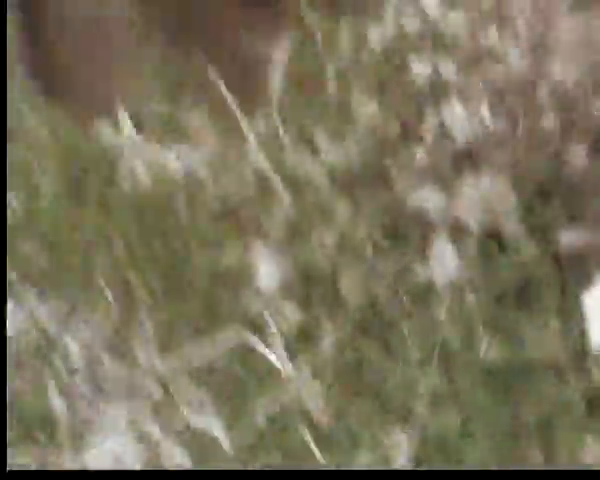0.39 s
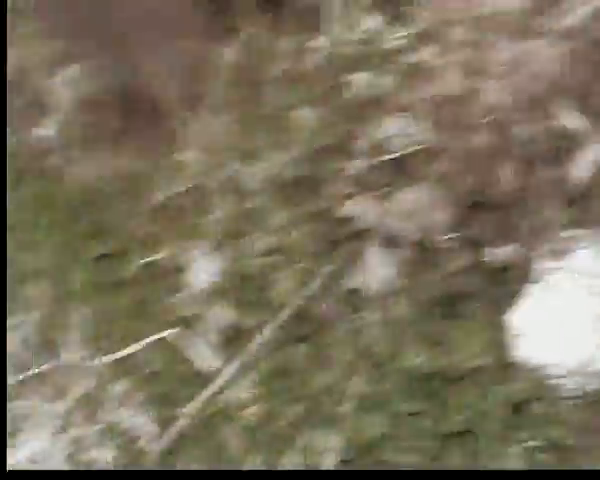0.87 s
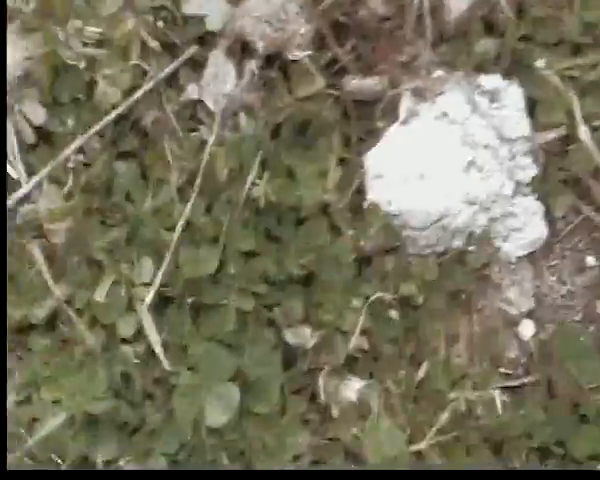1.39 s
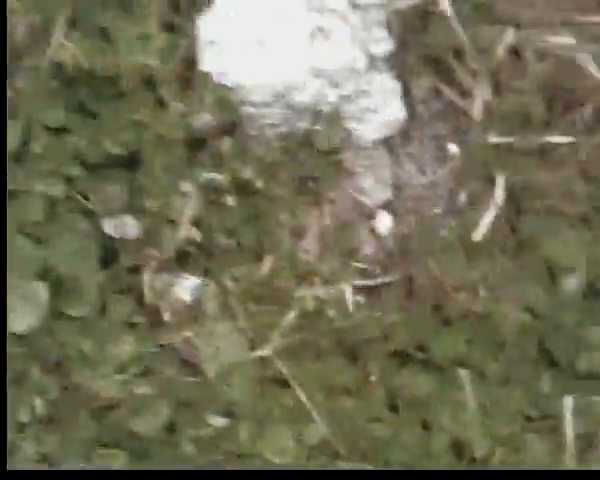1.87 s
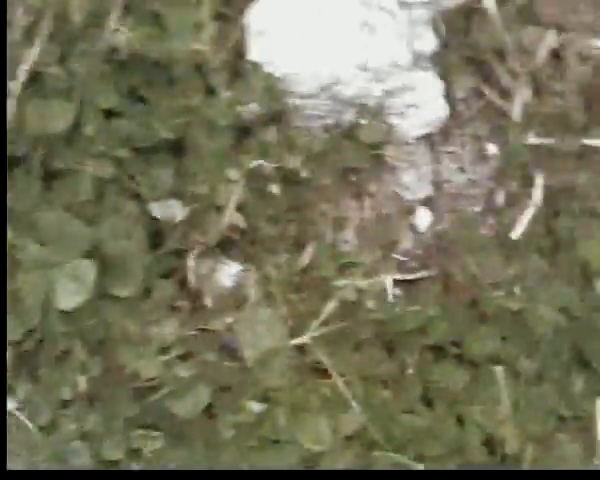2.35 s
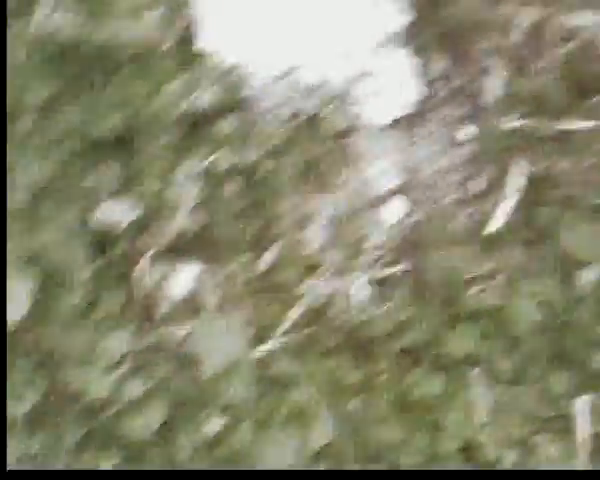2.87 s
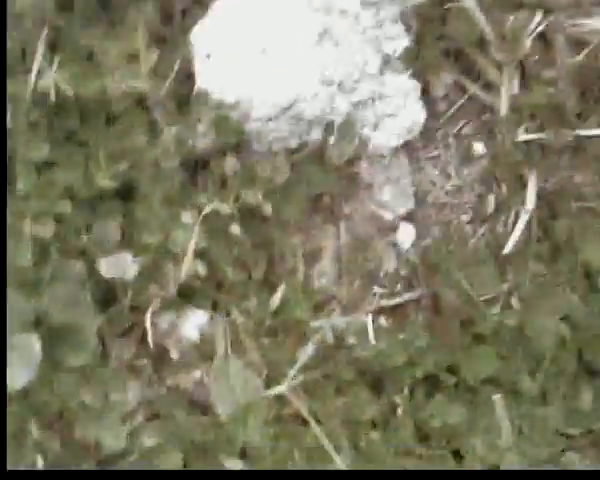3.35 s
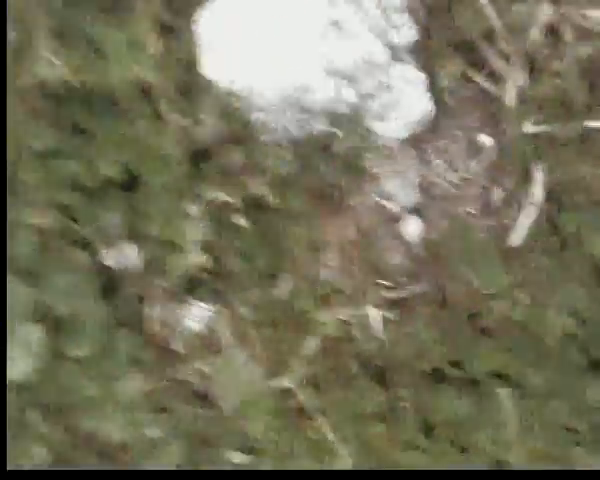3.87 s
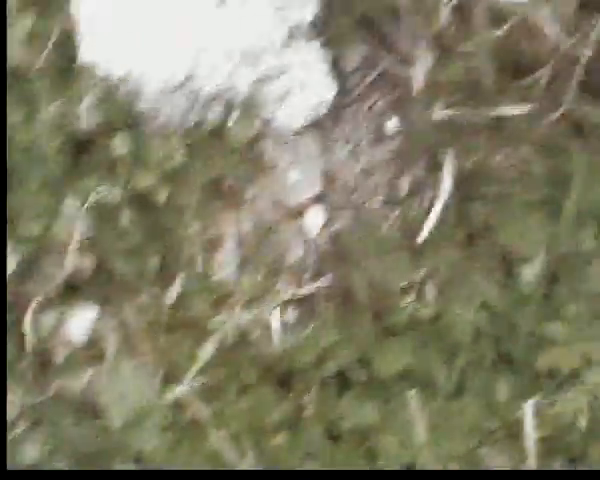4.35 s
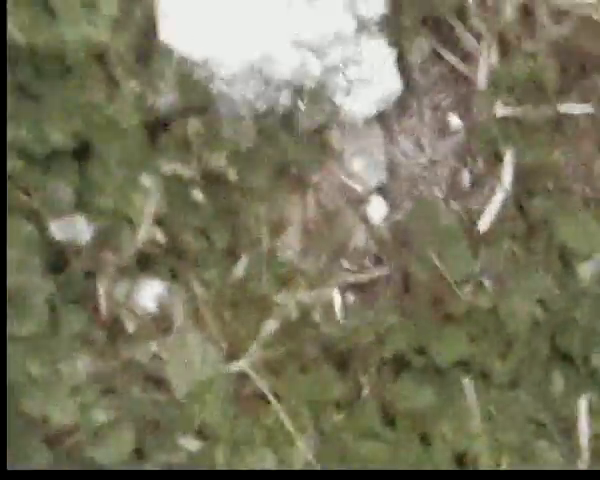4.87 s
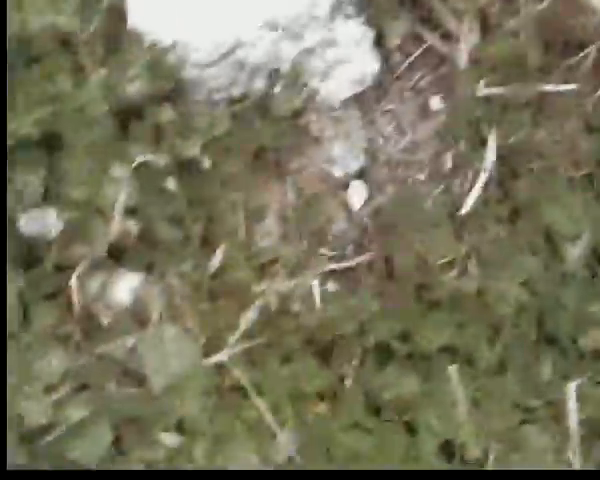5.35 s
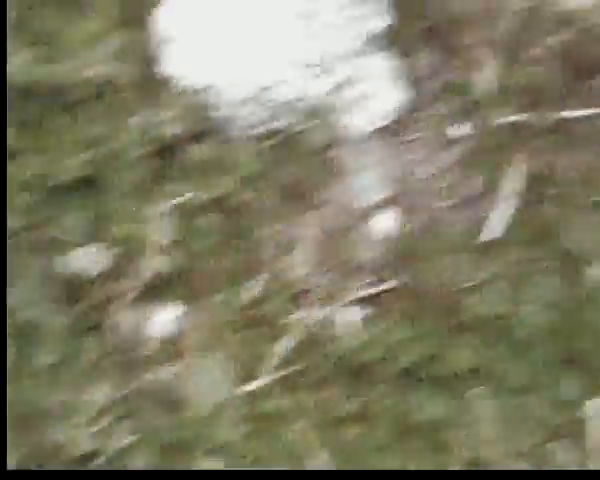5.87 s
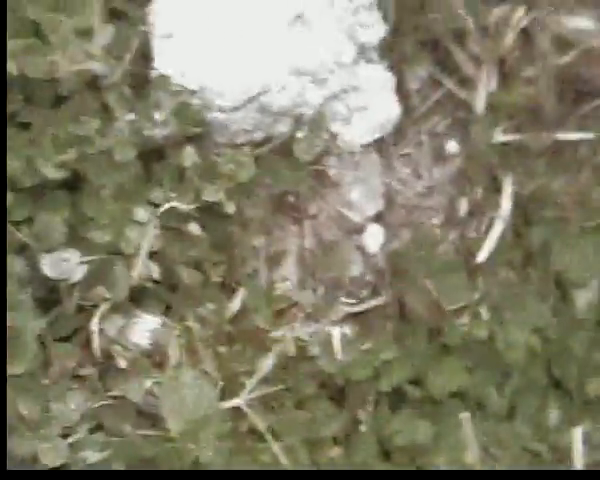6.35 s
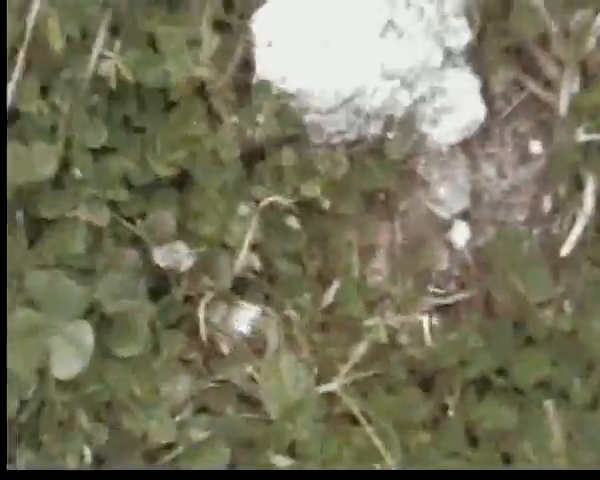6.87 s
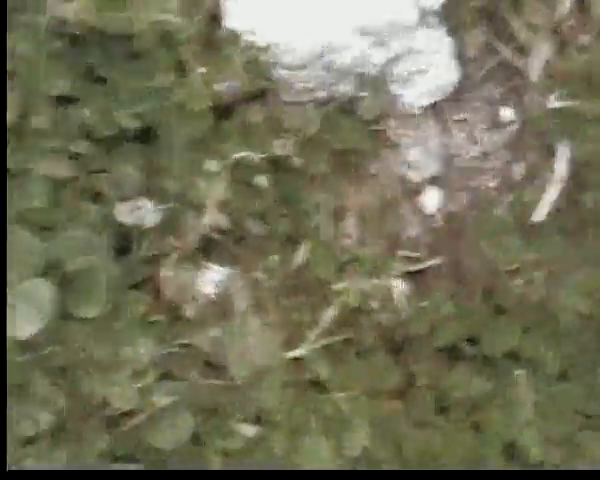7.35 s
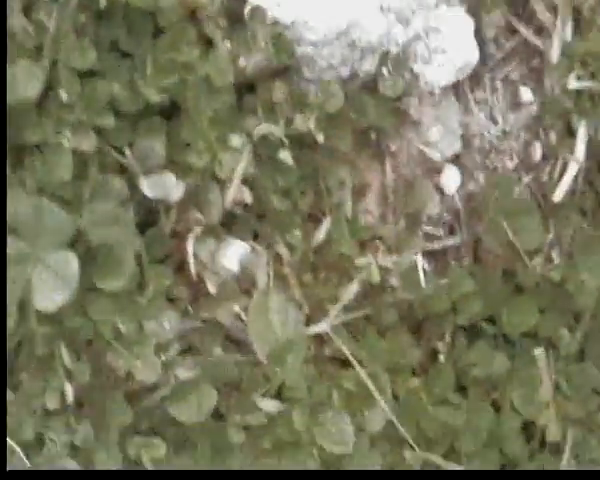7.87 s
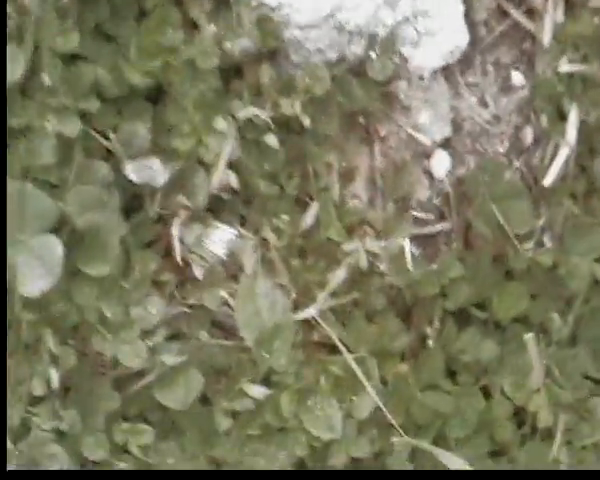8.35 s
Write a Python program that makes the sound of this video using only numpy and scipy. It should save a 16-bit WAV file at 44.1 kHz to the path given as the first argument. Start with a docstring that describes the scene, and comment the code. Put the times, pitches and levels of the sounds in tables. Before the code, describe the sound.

Close to a camera microphone outdoors, a small metal hand tool chops stony soil about three times a second. Each bite crunches, rings briefly and thuds, then the blade judders back over grit and loose crumbs patter. A small bird gives sharp upward chips now and then over a soft distant hush. Loud blows distort slightly, and a faint electronic whine persists.

```python
"""Stony, weedy soil at the edge of a far field hush, with one microphone on a camera.
In front, a small steel hand tool chops in a quick rhythm and is dragged back juddering over grit: bursts
of tiny impacts drive the blade's resonances. The ground thuds in low resonances, the handle knocks, and loose
crumbs patter down as clumped grains. A small bird chips nearby in upward flicks with leafy echoes, over
shaped noise. The camera whines faintly, clips the loud blows and ducks after them."""
import sys
import numpy as np
from scipy import signal
from scipy.fft import rfft, irfft, next_fast_len
from scipy.io import wavfile
from scipy.ndimage import uniform_filter1d, minimum_filter1d, map_coordinates

SR = 44100
rng = np.random.default_rng(int(sys.argv[2]) if len(sys.argv) > 2 else 0)


def wrap_up_sound(samples):
    """Save the sound to the file named by the first command line argument, as 16-bit audio."""
    columns = np.atleast_2d(samples).T
    # keep every value between -1 and 1, then stretch to whole-number steps
    tamed = np.clip(columns, -1, 1)
    steps = np.round(tamed * 32767).astype(np.int16)
    wavfile.write(sys.argv[1], SR, steps)


def volts_from_decibels(level):
    """Turn decibel levels (scalar or array-like) into linear amplitude factors."""
    exponent = np.asarray(level, float) / 20
    return 10 ** exponent


N = 385434
T = np.arange(N) / SR

# Levels in the tables are relative settings: sources add their own offsets, some a random spread.
# The blade chops in: (time [s], blade level [dB], soil over blade [dB], bright ring over blade [dB],
# length scale [ms], thud level [dB])
CHOP_BLOWS = [(0.4321, -18.5, 2, 3, 5.6, -15.5), (0.851, -1.5, -10.5, 1.5, 3.1, -15),
              (1.1979, -4, -13.5, 2.5, 3.4, -15), (1.5423, -15.5, -5.5, -2, 5.6, -18),
              (1.8788, -8.5, -15, -4.5, 5.4, -23), (2.2295, -14, -11, -1.5, 6.2, -27),
              (2.597, -0.5, -17.5, -4.5, 1.7, -20.5), (2.9405, -10, -3, 2.5, 4.1, -18.5),
              (3.295, -11, -5.5, 3, 4.2, -14), (3.6524, 1, -10.5, -5, 3.6, -20),
              (4.0305, -1, -7.5, -8.5, 4.05, -21), (4.385, -8.5, -2.5, -3.5, 4.2, -21.5),
              (4.7412, -14, 6, 0, 2.04, -10), (5.1181, -6.5, -3.5, -11.5, 3.7, -13),
              (5.4853, 0.5, -29, -4.5, 4.6, -21.5), (5.85, -5, -6, -10.5, 5.1, -18.5),
              (6.2309, -9.5, -2.5, -2.5, 4.3, -19), (6.6288, -6, -1.5, -5.5, 3.6, -28.5),
              (7.0448, -14, -1, -2.5, 5.9, -16.5), (7.594, -2.5, -10, -11.5, 2, -18),
              (8.1175, -7.5, -15.5, 4.5, 4, -24), (8.6192, -18, 0.5, 1, 4.1, -23)]
# The blade catches on stones and roots: (time [s], blade level [dB], soil over blade [dB],
# bright ring over blade [dB], length scale [ms])
STONE_CATCHES = [(0.0132, -11.5, 0.5, -10, 1.5), (0.0274, -7.5, -7.5, -10.5, 6.1),
                 (0.0434, -8, -10, -10, 3.9), (0.0566, -4, -12, -6.5, 4), (0.0692, -15.5, -2, 6, 1.7),
                 (0.107, -15.5, -1, -2.5, 4.5), (0.1276, -17.5, -13.5, -3.5, 1.7),
                 (0.2928, -24.5, -10, -24, 2.9), (0.3753, -42.5, 12.5, -17, 10.4),
                 (0.474, -1.5, -4, -11, 8.7), (0.5053, 1, -10, -10.5, 4.8), (0.5576, -8, -5.5, -1, 3.1),
                 (0.8888, -10, -0.5, -13, 2.4), (0.9082, -9.5, -10.5, -1.5, 3),
                 (0.956, -30.5, 1.5, 5.5, 2.2), (1.158, -41.5, 22.5, 19.5, 2.1),
                 (1.1922, -2, -15, -15, 1.7), (1.2369, -7, -6.5, -5.5, 3.7), (1.259, -4.5, -4.5, -4, 2.7),
                 (1.3145, -17.5, -29, -3.5, 4), (1.5784, -24, -7, -16, 4.4), (1.6177, -21.5, -13, -2.5, 12),
                 (1.6514, -21, -7, -0.5, 3.2), (1.8961, -4, -5, -2, 3.7), (1.96, -25.5, -9, 7.5, 2),
                 (1.9817, -20, -7, -2, 2), (2.0046, -6, -10.5, -6, 5.3), (2.2394, 5.5, -11.5, -13, 1.45),
                 (2.2996, -28, -21, 7, 9.7), (2.3315, -12.5, -9, 1, 2.1), (2.3457, -32, -1, -21, 3.5),
                 (2.357, -12.5, -5, -20, 1.33), (2.6457, -30, -23, -2, 5.8), (2.6653, -15, -11.5, -6, 9.9),
                 (2.7052, -4, -14, -4, 4.6), (2.9904, -18, -6, -4, 4.9), (3.003, -16, -16, -0.5, 9.7),
                 (3.042, -2.5, -25, -5, 2.7), (3.0488, -7.5, -13, -3.5, 6.1), (3.0716, -11.5, -44, -9.5, 4),
                 (3.3483, -8, -14, -12, 5.5), (3.3643, -12, -19, -3, 11), (3.4235, -9, -8, -10, 4),
                 (3.4523, -31, -22, -5, 3), (3.694, -2.5, -16, -27, 5.3), (3.7287, -4, -14.5, -3, 5.1),
                 (3.7627, -2.5, -16.5, -4.5, 5.7), (3.7883, -5, -25, -13, 4), (3.8021, -2, -20, -9.5, 3.7),
                 (3.82, -23, -16, 4, 3.3), (3.834, -34, -15, 2, 3.1), (4.0826, -12.5, -10.5, -7, 12),
                 (4.1078, -14.5, -10.5, 1.5, 3.7), (4.136, -4.5, -8.5, -4.5, 3.8),
                 (4.4371, -18, -9, -1, 4.8), (4.4571, -6, -4.5, -2.5, 8.1), (4.5334, -21, -22, 1.5, 2.8),
                 (4.5432, -24.5, -28, -2, 2.4), (4.7624, -3.5, -8, -3.5, 1.45),
                 (4.8067, -2, -12.5, -9, 5.8), (4.8167, -4, -14, -6, 12), (4.8756, -14.5, -8, 3.5, 3.6),
                 (4.929, -29, -7.5, -3, 3.2), (5.153, -21, -6, -12, 2.2), (5.1711, -16, -13, -6, 2.5),
                 (5.1781, -12, -7, -5, 12), (5.2015, -10, -18, -2.5, 2.5), (5.2223, -7.5, -2.5, -7, 2.7),
                 (5.2368, -15, -16, -20, 5.1), (5.2673, -23.5, -11, -28, 3.7), (5.3088, -29, -17, 1.5, 2.8),
                 (5.5041, -2.5, -6.5, -16, 1.6), (5.5614, -13, -4.5, -5.5, 7),
                 (5.5779, -8.5, -8, -2.5, 5.5), (5.6059, -2.5, -14.5, -12.5, 2.1),
                 (5.906, -19.5, -6, -14, 3), (5.9131, -10.5, -12.5, -10, 2.5), (5.9264, -8, -12, -5, 4.5),
                 (5.9417, -8, -17.5, -9, 3.3), (5.961, -9, -7, -5, 3.3), (6.004, -22, -17, -6.5, 2.4),
                 (6.2498, -13.5, -11.5, -10, 4.9), (6.297, -15, -13.5, -27, 2.9),
                 (6.3048, -9, -8, -25, 2.2), (6.31, -3, -26.5, -10, 4), (6.352, -5, -10, -10.5, 2.8),
                 (6.3766, -7, -9, -9, 1.9), (6.6422, -7, -9, -16, 1.6), (6.6917, -12, -6, -3, 3.8),
                 (6.6989, -6, -13, -10.5, 7.1), (6.7067, -10, -10, -12, 4), (6.7155, -11.5, -14, -14, 2.8),
                 (6.7277, -19, -29, 4.5, 1.8), (6.751, -6.5, -16.5, 2, 2.8), (6.8233, -29.5, -21, 2.5, 3.7),
                 (7.033, -23, 3, 5, 2.9), (7.1097, -13.5, -4.5, -4, 8.7), (7.1277, -7, -12.5, -10, 11.5),
                 (7.1606, -6.5, -16.5, -8, 7.2), (7.197, -15, -18.5, -9, 6.2),
                 (7.2522, -31, -27, 12.5, 2.6), (7.2773, -33.5, -9, 10.5, 5.5), (7.6104, -24, -3, 0.5, 4),
                 (7.691, -26, 0, -1, 4), (7.7122, -17, -6, -10, 5.4), (7.7313, -7, -15.5, -4.5, 1.7),
                 (7.758, -6, -20, -13, 3.6), (7.7684, -17, -14, -16, 2.8), (7.784, -6, -13.5, -4, 1.7),
                 (8.1311, -17, 4.5, -16, 12), (8.1876, -9.5, -11.5, -6.5, 3.7), (8.2033, -8, -18, -22, 4.8),
                 (8.2302, -14, -13, -7, 4.9), (8.2493, -18, -13, -5.5, 9.4), (8.2636, -13, -9, -12, 6.6),
                 (8.2796, -10, -19, -13, 4), (8.302, -31, -6, -13, 5.3), (8.3416, -32, -1, 4, 5.7),
                 (8.6324, -21.5, -2, -0.5, 8.1), (8.7042, -17.5, 3, -8, 4.6), (8.7251, -2.5, -8.5, -3, 4.1)]
# The blade is dragged back, then crumbs fall: (start [s], end [s], grind level [dB], crumb level [dB],
# patter length [s])
DRAG_STROKES = [(0.043, 0.11, -69, -51, 0.12), (0.467, 0.52, -45, -49, 0.13), (0.888, 0.96, -35, -41, 0.13),
                (1.245, 1.318, -63, -42, 0.062), (1.585, 1.658, -34, -47, 0.19),
                (1.94, 2.012, -33, -63, 0.057), (2.282, 2.367, -29.5, -47.5, 0.11),
                (2.646, 2.727, -25.5, -46.5, 0.13), (2.988, 3.059, -37, -44.5, 0.14),
                (3.351, 3.413, -32.5, -50, 0.11), (3.707, 3.838, -28.5, -51, 0.08),
                (4.081, 4.136, -37, -44, 0.19), (4.42, 4.545, -32, -47, 0.095),
                (4.799, 4.882, -25.5, -40.5, 0.059), (5.161, 5.273, -34, -45, 0.078),
                (5.542, 5.606, -36.5, -40.5, 0.078), (5.906, 5.978, -26.5, -47, 0.11),
                (6.297, 6.379, -21.5, -37.5, 0.079), (6.686, 6.776, -44, -37.5, 0.067),
                (7.09, 7.27, -34, -43, 0.077), (7.661, 7.785, -37.5, -38, 0.14),
                (8.173, 8.345, -34.5, -44, .13), (8.591, 8.72, -34, -61, .1)]
# The blade skids on stone: (time [s], level [dB])
STONE_SKIDS = [(2.983, -0.5), (3.338, -10.5), (3.691, 6.5), (4.065, -7.5)]
# The handle knocks hard: (time [s], level [dB])
HANDLE_KNOCKS = [(2.594, -35.5), (4.03, -41), (5.222, -24.5), (5.85, -24.5), (6.637, -28), (7.041, -21),
                 (7.594, -19.5)]
# The tool's weight lands apart from a chop: (time [s], thud level [dB])
TOOL_LANDINGS = [(.049, -18.5), (0.108, -24), (.508, -29), (1.259, -31), (1.9, -16.5), (2.24, -30),
                 (4.765, -25), (4.836, -29), (5.155, -24), (5.221, -28), (8.137, -21.5)]
# A small bird chips: (time [s], level [dB])
BIRD_CHIPS = [(0.676, -39), (0.7236, -40), (0.804, -39), (1.063, -38), (2.5074, -36), (2.5574, -36),
              (2.7914, -37), (2.8654, -33.5), (3.144, -39), (4.614, -36), (4.6663, -35.5), (5.0569, -39),
              (5.3667, -42.5), (5.712, -38), (6.5061, -39), (7.5014, -40), (7.9244, -35), (8.075, -35)]

# Resonances, low to high: soil at the blade, blade bending, blade edge, high shimmer, ground under the tool.
# Each: (frequency [Hz], width [Hz], level [dB])
SOIL_MODES = [(562, 387, -3), (980, 310, 0), (1620, 1060, -6.5)]
BEND_MODES = [(2104.5, 275, -2), (2338, 507, 1.5), (2662, 410, -3.5)]
EDGE_MODES = [(3200, 170, -6), (4260, 190, 0), (4800, 2200, -4), (5520, 130, -2), (5880, 140, -8)]
SHIMMER_MODES = [(7330, 65, -3), (7540, 55, -1), (8180, 90, -3), (10160, 90, -10), (11470, 65, -2),
                 (12985, 50, -7), (15410, 60, -5), (10500, 9000, -11)]
GROUND_MODES = [(171.9, 20.7, -13.5), (204, 34, -11.5), (275, 90, -22.5), (68, 80, -45)]

# Spectrum of falling crumbs: (frequency [Hz], level [dB per Hz])
CRUMB_SPECTRUM = [(200, -18), (500, 1.5), (1300, -2), (2200, -16), (5000, -7), (9000, -14.5), (15500, 0),
                  (16300, -43)]
# Spectrum of the far hush: (frequency [Hz], level [dB per Hz])
HUSH_SPECTRUM = [(15, -49.5), (40, -33), (150, -1.5), (400, -3), (800, -8.5), (1700, -15.5), (2400, -18),
                 (3500, -16.5), (7500, -22), (10000, -22.5), (15500, -18), (16200, -56.5)]


def unit(x):
    """Brings a signal to rms 1."""
    return x / np.sqrt(np.mean(x ** 2) + 1e-20)


def coloured(x, spectrum):
    """x through (Hz, dB) points read on a log axis, rms 1."""
    m = next_fast_len(N + 8192)
    f, db = np.transpose(spectrum)
    gain = volts_from_decibels(np.interp(np.log(np.fft.rfftfreq(m, 1 / SR) + 1), np.log(f), db))
    return unit(irfft(rfft(x, m) * gain, m)[:N])


def resonate(x, hz, width_hz):
    """One resonance; white noise of rms 1 leaves it at rms 1."""
    b, a = signal.iirpeak(hz, hz / width_hz, SR)
    return signal.lfilter(b, a, x) / np.sqrt(np.pi * width_hz / SR)


def place(seconds, shapes):
    """Adds each row of shapes to the time line at its own moment."""
    start = np.round(seconds * SR).astype(int)
    at = np.maximum(start[:, None] + np.arange(shapes.shape[1]), 0)
    return np.bincount(at.ravel(), shapes.ravel(), N + SR)[:N]


def grit(per_s, spread_db, smooth):
    """Tiny impacts of very unequal size on a share of smooth noise, rms 1."""
    hit, size, sign = rng.random((3, N))
    sizes = volts_from_decibels(-spread_db * np.log(size + 1e-4))
    grains = (hit < per_s / SR) * np.sign(sign - .5) * sizes
    return unit(unit(grains) + smooth * rng.standard_normal(N))


def wobble(rate):
    """A smooth random curve, rate knots a second."""
    return map_coordinates(rng.standard_normal(int(N * rate / SR) + 4), [T * rate])


def mode_levels(db, soil_db, bright_db):
    """Levels for soil, bend, edge and shimmer resonances; the shimmer grows faster than the edge."""
    edge_db = db + bright_db - 4.5
    shimmer_db = db + 1.35 * bright_db - 10.5
    return db + soil_db, db, edge_db, shimmer_db


def contact_swells(length_ms, is_chop, t):
    """Force envelopes: a chop arrives at once after a faint brush of stems; a catch grinds before it grips."""
    u = np.maximum(t, 0) / (0.00054 * np.maximum(length_ms, .5)[:, None])  # a catch peaks at u = 1
    chop_rise_s, brush_s, catch_lead_s, let_go_s = .002, .006, 0.0042, 0.0018
    catch_lead = volts_from_decibels(-12.5)
    chop = 1.93 * np.clip(t / chop_rise_s + 1, 0, 1) ** 2 * np.exp(-(u / 2.49) ** 2)
    swell = np.where(is_chop, chop, u * np.exp(1 - u))
    brush = volts_from_decibels(-24.5) * np.exp(t / brush_s)
    lead = np.where(is_chop, brush, catch_lead * np.exp(t / catch_lead_s))
    return swell + np.where(t < 0, lead, catch_lead * np.exp(-t / let_go_s))


def drag_grind():
    """The blade rubs steadily through each drag, its force juddering at random."""
    ease_s = 0.0097
    grind = np.zeros(N)
    for a, b, grind_db, *_ in DRAG_STROKES:
        grind += volts_from_decibels(grind_db) * np.interp(T, [a - ease_s, a, b, b + ease_s], [0, 1, 1, 0])
    return grind * volts_from_decibels(5.5 * wobble(140))


def blade():
    """Swells of grit impacts drive the resonances; each contact strikes every one at a new strength."""
    contacts = [c[:5] for c in CHOP_BLOWS] + list(STONE_CATCHES)
    s, db, soil_db, bright_db, length_ms = np.transpose(contacts)
    t = np.arange(-1500, 1800) / SR
    is_chop = (np.arange(len(s)) < len(CHOP_BLOWS))[:, None]
    swell = contact_swells(length_ms, is_chop, t)
    luck_db = 2.5 * rng.standard_normal((len(s), 20))
    clumps = volts_from_decibels(3.07 * wobble(250))
    force = unit(clumps * grit(per_s=4000, spread_db=2.5, smooth=0.73))
    grind = drag_grind()
    contact_levels = mode_levels(db, soil_db, bright_db)
    rub_levels = mode_levels(0, soil_db=-8, bright_db=-3)
    families = (SOIL_MODES, BEND_MODES, EDGE_MODES, SHIMMER_MODES)
    out, k = np.zeros(N), 0
    for level, rub_db, modes in zip(contact_levels, rub_levels, families):
        total = np.sqrt(sum(volts_from_decibels(2 * m[2]) for m in modes))
        for hz, width, mode_db in modes:
            strike = volts_from_decibels(level + mode_db + luck_db[:, k])[:, None]
            drive = place(s + t[0], swell * strike) + volts_from_decibels(rub_db + mode_db) * grind
            out += (-1) ** k * resonate(force * drive, hz, width) / total  # alternate signs
            k += 1
    return out


def squeaks():
    """The blade skids on a stone: a few ever faster slips, a rising tone with overtones."""
    s, db = np.transpose(STONE_SKIDS)
    turn = 2 * np.pi * np.cumsum(np.linspace(800, 1900, num=330)) / SR
    skid = np.sin(turn) + 0.54 * np.sin(2 * turn) + 0.81 * np.sin(3 * turn)
    skid = skid * np.hanning(330) ** 2
    return place(s - .003, volts_from_decibels(db - 6.5)[:, None] * skid)


def ground():
    """A soft push sets off the soil's low resonances in a new mix each time; a shorter one knocks the handle."""
    catch_thud_db, knock_db = -16.5, -47  # over the soil's level
    lag_s = 0.0033
    pushes = [(c[0], c[1] + c[2], c[5]) for c in CHOP_BLOWS]
    pushes += [(c[0], c[1] + c[2], c[1] + c[2] + catch_thud_db) for c in STONE_CATCHES]
    pushes += [(s, db, db) for s, db in TOOL_LANDINGS]
    s, soil_db, thud_db = np.transpose(pushes)
    luck = rng.standard_normal((len(s), len(GROUND_MODES) + 1))
    tap, push = np.hanning(50), np.hanning(110)
    tap_level = volts_from_decibels(soil_db + knock_db + 2.8 * luck[:, -1])
    taps = place(s + lag_s, tap_level[:, None] * tap)
    hard_s, hard_db = np.transpose(HANDLE_KNOCKS)
    hard_taps = place(hard_s, volts_from_decibels(hard_db)[:, None] * tap)
    out = resonate(taps + hard_taps, hz=432, width_hz=68)
    for k, (hz, width, db) in enumerate(GROUND_MODES):
        push_level = volts_from_decibels(thud_db + db + 2.7 * luck[:, k])
        out += resonate(place(s + lag_s, push_level[:, None] * push), hz, width)
    return out


def crumbs():
    """Dense fine patter in clumps: it builds under the drag, thins out and stops; it also stirs the blade."""
    build_s, thins_db = 0.084, 11
    level = np.zeros(N)
    for _, end, _, db, patter_s in DRAG_STROKES:
        times = [end - build_s, end, end + patter_s, end + patter_s + 0.06]
        levels_db = [db - 42.5, db, db - thins_db, db - thins_db - 18]
        level += volts_from_decibels(np.interp(T, times, levels_db, -120, -120))
    fall = grit(per_s=1200, spread_db=2.8, smooth=.9)
    ring_modes = BEND_MODES + EDGE_MODES + SHIMMER_MODES[:-1]  # without the broad last one
    ring = sum(volts_from_decibels(db) * resonate(fall, hz, width) for hz, width, db in ring_modes)
    clumps_db, stirs_db = 4 * wobble(45), 4 * wobble(25)
    patter = volts_from_decibels(clumps_db) * coloured(fall, CRUMB_SPECTRUM)
    return level * (patter + volts_from_decibels(stirs_db - 15) * ring)


def birds():
    """A nearby bird flicks up through an octave in a few ms, heard mostly in leafy echoes."""
    s, db = np.transpose(BIRD_CHIPS)
    t = np.arange(500) / SR
    hz = 9000 - 4600 * np.exp(-t / 0.0033)
    flick = np.sin(2 * np.pi * np.cumsum(hz) / SR) * np.sqrt(np.hanning(500))
    echo = rng.standard_normal(3000) * volts_from_decibels(-60 * np.arange(3000) / SR / 0.14)  # falls 60 dB in 0.14 s
    echo[0] = 5.  # direct sound
    chips = place(s, volts_from_decibels(db - 5.5)[:, None] * flick)
    chips = chips + 0.48 * resonate(chips, 6600, 350)
    return signal.fftconvolve(chips, echo / np.linalg.norm(echo))[:N]


def field():
    """Far wind and traffic hush: shaped noise, a little unsteady."""
    waver_db = 1.1 * wobble(8)
    return volts_from_decibels(-51.5 + waver_db) * coloured(rng.standard_normal(N), HUSH_SPECTRUM)


def scene():
    """Everything in front of one microphone."""
    return (blade() + squeaks() + ground() + crumbs() + birds() + field())[None]


def whine():
    """The camera leaks a high tone that flips sign at every picture field, and a soft blip at every picture."""
    whine_hz, fields_per_s = 14199.6, 50
    flip = volts_from_decibels(-54.5) * np.tanh(2.5 * np.sin(np.pi * fields_per_s * T))
    since = (T - .029) % (2 / fields_per_s)  # seconds since the last blip began
    hz = 2420 - 250 * np.exp(-since / 0.0088)
    swell = since / 0.0043 * np.exp(1 - since / 0.0073)
    blip = swell * np.sin(2 * np.pi * np.cumsum(hz) / SR)
    blip = volts_from_decibels(-62 + 2.5 * wobble(25)) * blip
    return flip * np.sin(2 * np.pi * whine_hz * T) + blip


def roll_off(x):
    """The treble ends steeply here."""
    return signal.sosfilt(signal.butter(12, 16830, fs=SR, output="sos"), x)


def record(dry):
    """Loud blows clip before the gain ducks; it holds some 40 ms; the treble ends sharply."""
    x = dry + whine()
    need = np.minimum(1, (.55 / (np.abs(x) + 1e-6)) ** .8)
    # both windows look back only, so the gain comes down late
    held = minimum_filter1d(need, size=1801, origin=900)
    x = x * uniform_filter1d(held, size=401, origin=200)
    x = x / (1 + np.abs(x / .78) ** 5) ** (1 / 5)  # soft clipping towards 0.78
    treble_end = signal.ellip(10, .1, 60, 16150, fs=SR, output="sos")
    x = signal.sosfiltfilt(treble_end, x)
    return roll_off(x)


dry = scene()
out = record(dry)
wrap_up_sound(out)
```